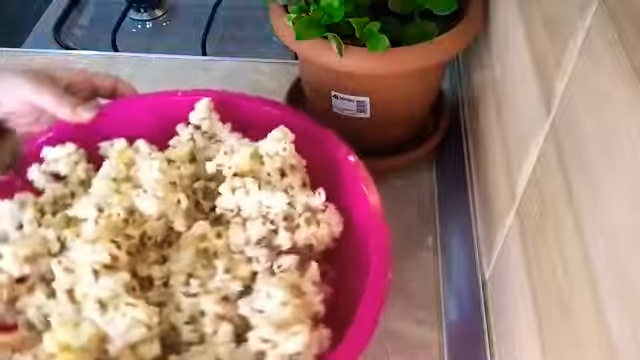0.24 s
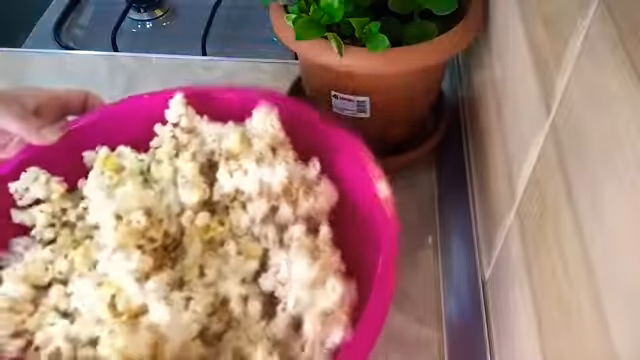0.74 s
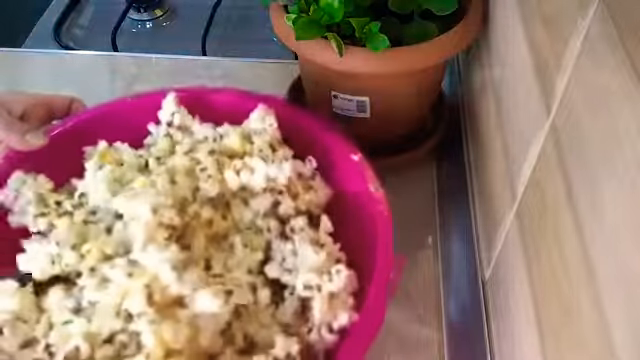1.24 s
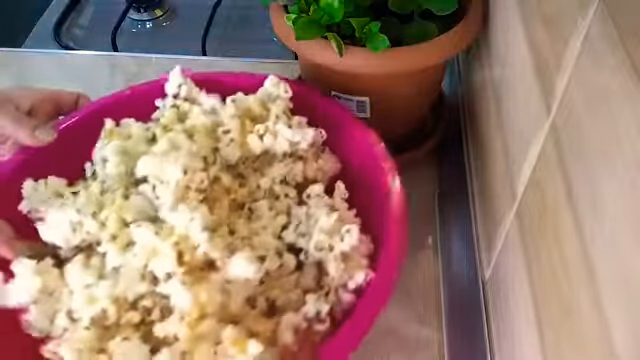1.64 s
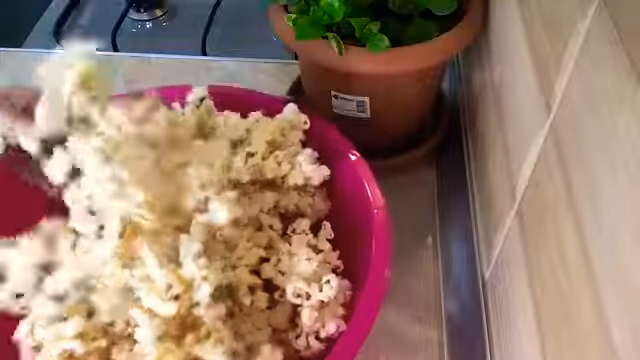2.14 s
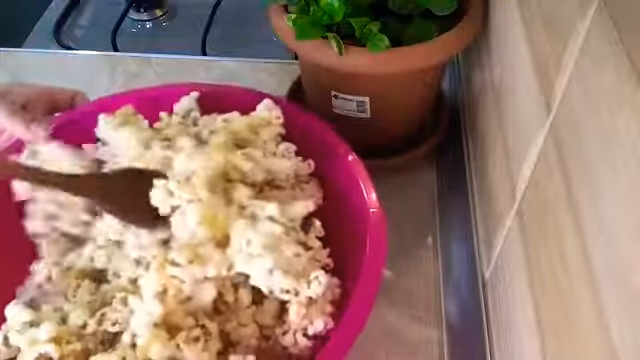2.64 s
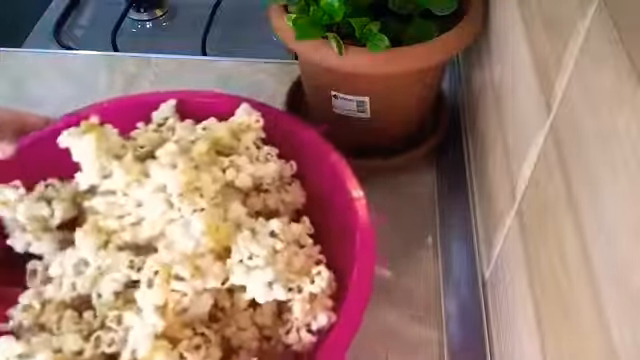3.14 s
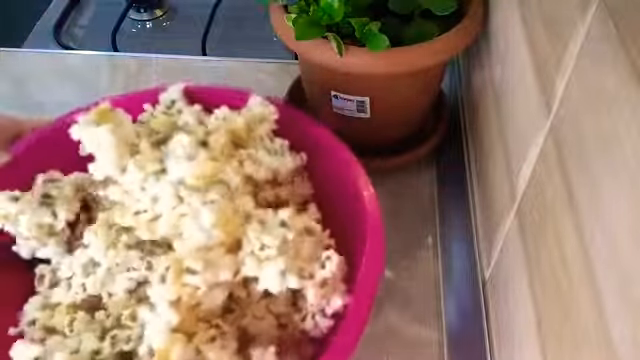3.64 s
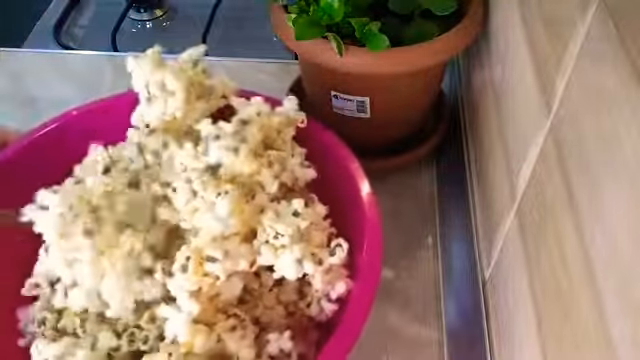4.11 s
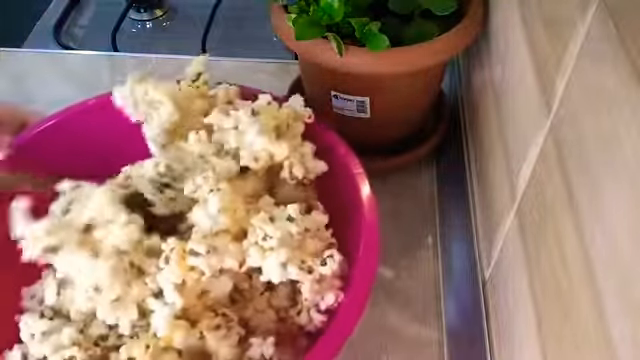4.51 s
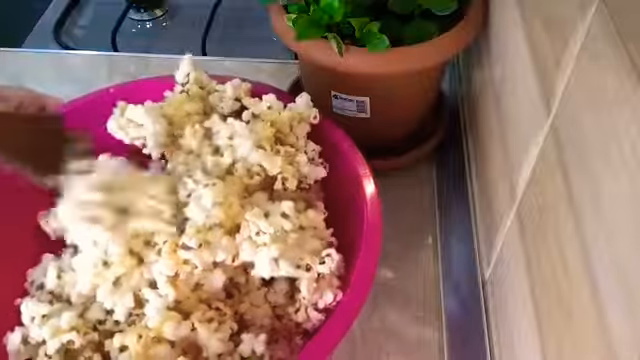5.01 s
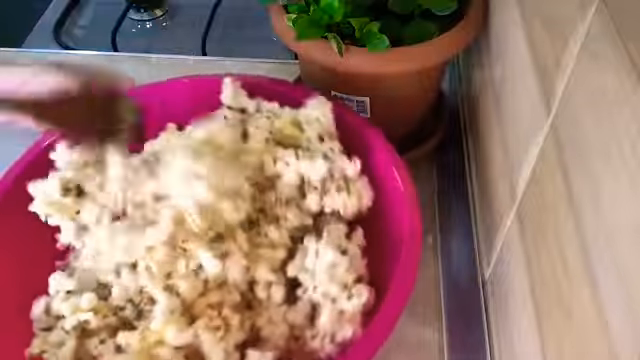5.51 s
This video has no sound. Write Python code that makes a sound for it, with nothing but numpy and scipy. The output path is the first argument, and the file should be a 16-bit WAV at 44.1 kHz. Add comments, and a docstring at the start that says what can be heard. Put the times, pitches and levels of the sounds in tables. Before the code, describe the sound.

A close microphone catches crisp caramel popcorn being stirred and tossed in a plastic bowl. It starts faintly, bursts into crackles and knocks at half a second, then moves through uneven strokes with lighter lulls. Around three seconds the snapping grows dense again, with a brief high squeak, and it later fades into gentle rustling. Small hard kitchen, quick short reflections, quiet low room hush.

```python
"""Caramel popcorn stirred in a plastic bowl

Hardened caramel popcorn is stirred and tossed with a wooden spoon in a plastic bowl on a kitchen counter.
The sugar shells crackle and snap: random clicks and timed cracks, each a burst of short ringing modes.
Clumps crunch, rub, tumble and now and then squeak; spoon and counter knock the bowl's decaying modes.
A small hard room answers with sparse echoes over a dull hush; the microphone is close.
"""
import sys
import numpy as np
from scipy import signal
from scipy.io import wavfile
from scipy.ndimage import uniform_filter1d

SR = 44100
rng = np.random.default_rng(int(sys.argv[2]) if len(sys.argv) > 2 else 0)


def to_wav(sig):
    """Store sig (one row per channel, or 1-D mono) as 16-bit WAV at the path in sys.argv[1].

    Samples outside -1..1 are clipped; the rate is SR.
    """
    pcm = np.clip(np.atleast_2d(sig), -1, 1) * 32767
    pcm = np.round(pcm).astype(np.int16)
    wavfile.write(sys.argv[1], SR, pcm.T)  # frames by channels


N = 254324
T = np.arange(N) / SR
EDGE_HZ = 16050  # top of the microphone's band

# spectrum of breaking sugar shells: [f/Hz, gain/dB]
SHELL_COLOUR = [(2400, -15.5), (3900, -9.5), (4800, -12), (5800, 1), (7400, -0.5), (9500, 2.5),
                (10400, -2.5), (11300, 0), (14500, -5), (16100, -12)]
# spectrum of crunching and rattling kernels: [f/Hz, gain/dB]
CRUNCH_COLOUR = [(800, -14), (1450, -2), (2100, -2), (2870, -1), (3500, -4.5), (4600, -6.5), (6800, -15),
                 (12000, -34)]


def amp(db):
    """Decibels to amplitude."""
    return 10 ** (np.asarray(db) / 20)


def unit(x):
    """Scale to an RMS of one."""
    return x / np.sqrt(np.mean(x ** 2) + 1e-20)


def read(points, hz):
    """A table of (Hz, value) joined by lines on a log-frequency axis."""
    f, value = np.transpose(points)
    return np.interp(np.log(hz + 1), np.log(f + 1), value)


def add(mix, s, sound):
    """Lay a sound into the mix from the time s, cut at the end."""
    part = mix[round(s * SR):][:len(sound)]
    part += sound[:len(part)]


def colour(x, points, size=8192):
    """Causal minimum-phase filter with the given spectrum, so clicks keep their sharp fronts."""
    hz = abs(np.fft.fftfreq(size, 1 / SR))
    log_gain = np.log(amp(read(points, hz)))
    spectrum = np.exp(signal.hilbert(log_gain).conj())
    taps = np.fft.ifft(spectrum).real[:size // 2]
    return signal.oaconvolve(x, taps)[:N]


def contacts(per_s, spread_db, cap):
    """Random tiny impacts, many weak and a few strong, with steady mean power."""
    size = amp(spread_db * np.minimum(rng.exponential(1, N), cap))
    struck = rng.random(N) < per_s / SR
    clicks = size * rng.choice([-1, 1], N) * struck
    power = uniform_filter1d(clicks ** 2, size=3500)
    return clicks / np.sqrt(abs(power) + 1e-6)


def chip(hz, ring_s, scatter, count=9):
    """A brittle shell breaks: a burst of splinters and a few brief modes scattered around its pitch."""
    t = np.arange(SR // 60) / SR
    modes_hz = np.minimum(hz * np.exp(scatter * rng.standard_normal((count, 1))), EDGE_HZ)
    ring = np.sin(2 * np.pi * (modes_hz * t + rng.random((count, 1)))).sum(0)
    splinters = rng.standard_normal(len(t)) * np.exp(-2 * t / ring_s)
    return unit(ring) * np.exp(-t / ring_s) + splinters


def grains(clicks, low_hz, high_hz, ring_s, count=28):
    """Every click strikes a kernel of random size; the size sets the pitch of its chip."""
    kernel = rng.integers(0, count, N)
    total = np.zeros(N)
    for k, hz in enumerate(np.geomspace(low_hz, high_hz, count)):
        sound = unit(chip(hz, ring_s, scatter=0.154, count=3))
        total += signal.oaconvolve(clicks * (kernel == k), sound)[:N]
    return unit(total)


def shifting(x, depth_db, size=9):
    """Gaps between the moving kernels open and close, so each moment has its own small resonances."""
    z = signal.stft(x, nperseg=512)[2]
    patches = rng.standard_normal(z.shape)
    for axis in (0, 1):  # smooth over frequency, then over time
        patches = uniform_filter1d(patches, size=size, axis=axis)
    return unit(signal.istft(z * amp(depth_db * unit(patches)), nperseg=512)[1][:N])


def stirring(axis):
    """Gain of crackle (0), crunch (1), rub (2) or tumble (3): strokes swell, hold, die as the heap settles."""
    # strokes of the spoon: [start t/s, attack/s, hold/s, release/s to fall 20 dB, effort/dB,
    #   then over the effort: bite into the clumps/dB, lean on the wall/dB, clumps dropped/dB]
    strokes = [(0.0, 0.0033, 0.0046, 0.24, -50.5, -11, -14, -2.5),
               (0.027, 0.061, 0.3, 0.132, -76.5, 5, 14, 11),
               (0.445, 0.053, 0.24, 0.27, -40, -1.5, -1.5, -2.5),
               (0.732, 0.038, 0.028, 0.18, -48.5, 10, 6, -15), (0.979, 0.244, 0.11, 0.6, -46.5, 4, 5, 0.5),
               (1.297, 0.21, 0.024, 0.08, -37.5, -0.5, -1, -13),
               (1.648, 0.17, 0.02, 0.16, -47.5, -8.5, 2.5, -6), (1.865, 0.02, 0.083, 0.1, -57, -4, 9.5, 12),
               (1.989, 0.091, 0.017, 0.23, -55, -18, -2.5, 2.5),
               (2.15, 0.057, 0.13, 0.03, -53.5, -10, 3.5, -0.5),
               (2.338, 0.18, 0.18, 0.13, -49, -10.0, -6.5, -4.5),
               (2.684, 0.072, 0.015, 0.18, -50.5, -2, 6.5, -0.5),
               (2.753, 0.048, 0.018, 0.06, -47, -4, -16, -9),
               (3.084, 0.058, 0.016, 0.23, -42.5, -1.5, 0.5, 0),
               (3.195, 0.037, 0.093, 0.148, -39.5, 3.5, 0, -1),
               (3.409, 0.018, 0.005, 0.25, -48.0, 7.0, 8.0, 3.5),
               (3.576, 0.09, 0.093, 0.17, -46.0, -3.0, 5.5, -2.0),
               (3.823, 0.04, 0.038, 0.04, -41.0, -3.0, 0.5, -3.5),
               (3.954, 0.033, 0.016, 0.84, -44, -8.5, -1.0, -6.5),
               (4.442, 0.14, 0.21, 0.03, -42.5, -5.0, -3, -3),
               (4.708, 0.057, 0.0045, 0.23, -47, 5, 10.5, 7.5), (4.82, 0.02, 0.04, 0.1, -46, -14, -17, -16),
               (5.127, 0.042, 0.017, 0.11, -44, -8.5, -12.5, -7),
               (5.173, 0.19, 0.112, 0.18, -44.0, -7.5, -9, -4),
               (5.44, 0.32, 0.015, 0.197, -60.0, -7.5, 6.5, -2)]
    # the bowl never rests in the hand: [crackle/dB, crunch/dB, rubbing/dB, tumbling/dB]
    resting = (-89, -96, -63, -56.5)
    swell_curve = 1.68  # a stroke's power grows with this power of time
    t = np.linspace(0, T[-1], num=N // 64)
    power = amp(resting[axis]) ** 2
    for start, attack, hold, release, effort_db, *shares_db in strokes:
        swell = np.clip((t - start) / attack, 0, 1) ** swell_curve
        settle_db = -20 * np.maximum(t - start - attack - hold, 0) / release
        stroke_db = effort_db + [0, *shares_db][axis] + settle_db
        power = power + swell * amp(stroke_db) ** 2
    return np.interp(T, t, np.sqrt(power))


def strays(gain, over_db, count):
    """Small events at random moments, as strong as the stirring is then: rows of (s, level dB)."""
    return [(T[i], 20 * np.log10(gain[i]) + over_db) for i in rng.integers(0, N, count)]


def room_tone(level_db=-58):
    """The quiet, dull hush of the kitchen: noise through a falling spectrum."""
    # spectrum of the hush: [f/Hz, gain/dB]
    hush_colour = [(28, -6), (85, -4.5), (280, 3.5), (520, -11.5), (1000, -10), (2000, -31), (4200, -29.5),
                   (9500, -32), (15800, -33)]
    return amp(level_db) * unit(colour(rng.standard_normal(N), hush_colour))


def reflections(t60_share, gap_s):
    """Sparse echoes of unit energy after a gap, the bass lasting longest."""
    # decay of the room, before each echo group's share: [f/Hz, t60/s]
    room_decay = [(85, 0.73), (320, 0.35), (950, 0.33), (2900, 0.21), (7800, 0.16), (15800, 0.19)]
    size = SR // 2
    arrives = (rng.random(size) < 4000 / SR) * (np.arange(size) / SR > gap_s)
    taps = rng.choice([-1, 1], size) * arrives
    hz, t, z = signal.stft(taps, SR, nperseg=256)
    t60 = t60_share * read(room_decay, hz)[:, None]
    tail = signal.istft(z * amp(-60 * t / t60), SR, nperseg=256)[1]
    return tail / np.linalg.norm(tail)


def kitchen(x, near_db=-10, far_db=-13.5):
    """Quick bright echoes from bowl and counter, then the fainter tail of the room."""
    bright = signal.butter(2, 1300, "highpass", fs=SR)
    near = signal.lfilter(*bright, reflections(t60_share=.2, gap_s=.0015))
    echoes = amp(near_db) * near + amp(far_db) * reflections(t60_share=0.73, gap_s=0.011)
    return x + signal.fftconvolve(x, echoes)[:N]


def squeaks(level_db=0, jitter=0.039, width=0.16):
    """Sticky kernels stick and slip on the plastic: an uneven train of slips through one broad resonance."""
    # squeaks: [t/s, length/s, level/dB, slip rate at the start f/Hz, at the end f/Hz, resonance f/Hz]
    squeak_table = [(0.787, 0.058, -40, 520, 440, 2740), (3.316, 0.017, -34.5, 1100, 990, 5850),
                    (3.38, 0.021, -49, 1300, 1300, 3900), (3.484, 0.036, -46, 770, 810, 1670)]
    out = np.zeros(N)
    order = np.arange(1, 15)[:, None]  # harmonics of the slip rate
    for s, length, db, start_hz, end_hz, peak_hz in squeak_table:
        slip_hz = np.linspace(start_hz, end_hz, round(length * SR))
        wander = unit(uniform_filter1d(rng.standard_normal(SR), size=40))[:len(slip_hz)]
        turns = np.cumsum(slip_hz * (1 + jitter * wander)) / SR
        resonance = 1 / np.hypot(width, np.log(order * slip_hz / peak_hz)) ** 2
        tone = (np.cos(2 * np.pi * order * turns) * resonance).sum(0)
        add(out, s, amp(db) * unit(tone) * signal.windows.tukey(len(tone)))
    return amp(level_db) * out


def tumble(level_db=0.0):
    """Light clumps fall on the bottom of the bowl with soft thuds."""
    # spectrum of the thuds: [f/Hz, gain/dB]
    thud_colour = [(24, -56), (42, -15), (66, 3), (96, 6), (135, -3.5), (205, 3.5), (295, -3.5), (395, 2),
                   (470, -9.5), (850, -9), (2100, -65), (8000, -113)]
    thuds = colour(contacts(per_s=320, spread_db=2.0, cap=10.0), thud_colour)
    return amp(level_db) * unit(thuds) * stirring(axis=3)


def knocks(level_db=-6, load=0.023, rattle_db=-8, rattle_s=0.0023, bounce_db=-7):
    """Each knock rings the bowl and jolts the kernels; low bending waves travel slower and arrive later."""
    # knocks by spoon and counter, before the layer levels:
    #   [t/s, strength level/dB, weight in the low modes/dB, hardness in the high modes and the rattle/dB]
    knock_table = [(0.149, -42, -1, 4), (0.4721, -11.5, -5, 0), (.557, -24, -5, -16),
                   (.636, -29, -1.5, 5.5), (.6925, -20, 4, 4.5), (.699, -17.5, 1, -19),
                   (1.032, -29, -16, 10.5), (1.2056, -6, 2.5, -6), (1.322, -34.5, -10, 18.5),
                   (1.4198, -27, -10.5, 15.5), (1.559, -25.5, -12.5, 7.5), (1.709, -30, -12, 8.5),
                   (1.8665, -8.5, 3, -0.5), (2.257, -34, -16, 3.5), (2.286, -32.5, -4.5, -2),
                   (2.326, -40.5, 4.5, 15), (2.766, -26, -28, 9.5), (3.206, -22.5, -4.5, 7),
                   (3.241, -25, -10, 15.5), (3.424, -31.5, 2, 7), (3.6245, -15, -3, 0),
                   (3.755, -23.5, 2, 1.5), (3.763, -26, 8.5, 5), (3.866, -31.5, -10, 9),
                   (4.259, -29.5, -26.5, 5), (4.301, -24, -30.5, 1.5), (4.3396, -27.5, -21, 4.5),
                   (4.757, -19, -32, -2), (4.791, -20, -9, 0.5), (4.934, -29.5, -14, -5),
                   (5.37, -26.5, -40, -25)]
    # modes of the plastic bowl, before the popcorn detunes them: [f/Hz, level/dB, t60/s]
    bowl_modes = [(74.2, -21, 0.2), (101, -6.5, 0.11), (125, -11.5, 0.028), (185, -7, 0.098),
                  (235, -14, 0.055), (328, -16, 0.16), (372, 1.5, 0.068), (475, -16.5, 0.094),
                  (564.6, -0.5, 0.067), (697, 0.5, 0.046), (798, -4, 0.019), (942, 0.5, 0.041),
                  (980, 3, 0.051), (1140, -3, 0.014), (1236, 4, 0.025), (1427, -10.5, 0.043),
                  (1573, -20.5, 0.11), (1627, -15.5, 0.025), (1767, -12.5, 0.02), (2320, -16.5, 0.013),
                  (2648, -3.5, 0.011), (2962, -13.5, 0.029)]
    tap_db, tap_weight_db, tap_hard_db = 9.5, -2, 9.5  # stray kernels tap the wall; first is over the rubbing
    travel_s, rise_s = .0007, .0003
    hz, mode_db, t60 = np.transpose(bowl_modes)[:, :, None]
    since = np.arange(SR // 4) / SR
    t = np.maximum(since - travel_s * (np.sqrt(hz.max() / hz) - 1), 0)
    fade = amp(mode_db - 60 * t / t60) * (1 - np.exp(-t / rise_s))
    ring, rattle = np.zeros((2, N))
    taps = [(s, db, tap_weight_db, tap_hard_db) for s, db in strays(stirring(axis=2), tap_db, count=50)]
    for s, strength_db, weight_db, hard_db in knock_table + taps:
        tilt = [(100, 2.2 * weight_db), (380, weight_db), (950, 0.032), (2600, hard_db)]  # (Hz, dB)
        blow = amp(strength_db + read(tilt, hz))
        spot = rng.uniform(-0.38, 0.43, hz.shape)  # where the blow lands shifts each mode's phase
        loaded_hz = hz * (1 + load * rng.standard_normal(hz.shape))  # the shifting popcorn detunes the wall
        knock = (blow * fade * np.sin(2 * np.pi * (loaded_hz * t + spot))).sum(0)
        add(ring, s, knock)
        add(ring, s + rng.uniform(.0065, .0085), amp(bounce_db) * knock)  # the springy wall strikes back once
        jolt = rng.standard_normal(len(since)) * np.exp(-since / rattle_s)
        add(rattle, s, amp(strength_db + hard_db) * jolt)
    return amp(level_db) * ring + amp(rattle_db) * colour(rattle, CRUNCH_COLOUR)


def snaps(level_db=-13.5, stage_s=0.0011, small_hz=6500, small_db=22):
    """The larger caramel shells break one by one, each crack running in a few quick stages."""
    # the largest shells breaking, before the layer level: [t/s, level/dB, centre of the modes f/Hz]
    snap_table = [(0.454, -11, 11000), (0.478, -20, 8350), (0.515, -9.5, 9900), (.5367, -6, 8950),
                  (.575, -11, 5500), (0.647, -13, 5360), (1.153, -16.5, 8490), (1.206, -3.5, 6830),
                  (1.331, -10, 9500), (1.420, -7, 5650), (1.867, -6, 6030), (2.382, -22, 11400),
                  (2.505, -22, 9000), (2.862, -16.5, 9600), (3.1103, -15, 11700), (3.201, -12, 4500),
                  (3.2223, -11, 7900), (3.241, -22, 6000), (3.2963, -9.5, 9200), (3.4312, -14.5, 6800),
                  (3.453, -9, 7100), (3.89, -17, 9700), (4.073, -12.5, 9000), (4.6416, -13, 6840),
                  (4.799, -14.5, 7600), (5.063, -30, 9550)]
    out = np.zeros(N)
    small = [(s, db, small_hz) for s, db in strays(stirring(axis=0), small_db, count=35)]
    for s, db, hz in snap_table + small:
        crack = np.cumsum(stage_s * rng.uniform(.5, 1.5, size=2))
        for delay, stage_db in zip([0, *crack], [0, -3, -7]):
            add(out, s + delay, amp(db + stage_db) * chip(hz, ring_s=0.00068, scatter=0.303))
    return amp(level_db) * colour(out, SHELL_COLOUR)


def crunch_and_rub(crunch_db=-3, rub_db=2.5, shared=0.63):
    """Clumps catch and slip under the spoon; each slip crunches a kernel and shakes the wall."""
    # spectrum of the rubbed wall: [f/Hz, gain/dB]
    rub_colour = [(200, -24), (460, -13), (565, -8), (790, -11), (950, 4), (1060, -2), (1320, -8),
                  (1620, -13), (2100, -23), (3800, -43), (9000, -70)]
    slips = contacts(per_s=1100, spread_db=3.5, cap=4.2)
    drag = contacts(per_s=500, spread_db=3.2, cap=4)
    kernels = grains(slips, low_hz=1360, high_hz=5500, ring_s=0.0022)
    crunch = shifting(colour(kernels, CRUNCH_COLOUR), depth_db=2.2)
    rub = shifting(colour(drag + shared * slips, rub_colour), depth_db=2.5, size=5)
    return amp(crunch_db) * crunch * stirring(axis=1) + amp(rub_db) * rub * stirring(axis=2)


def crackle(level_db=-1.0, fizz_db=-5, split_hz=9500):
    """Sugar shells of many sizes tick against each other over a fine sliding fizz."""
    # light grazing favours the smallest splinters: fineness at even bite, and its change per dB of bite
    fine_db, fine_per_bite = 0.4, -0.38
    clicks = contacts(per_s=1700, spread_db=4.2, cap=4.5)
    ticks = grains(clicks, low_hz=4277, high_hz=15350, ring_s=0.0026)
    fizz = amp(fizz_db) * rng.standard_normal(N)
    shells = shifting(colour(ticks + fizz, SHELL_COLOUR), depth_db=0.87)
    coarse = signal.sosfiltfilt(signal.butter(2, split_hz, fs=SR, output="sos"), shells)
    splinters = shells - coarse
    effort = stirring(axis=0)
    bite = stirring(axis=1) / effort
    fine = amp(fine_db) * bite ** fine_per_bite
    return amp(level_db) * (coarse / fine + splinters * fine) * effort


def scene():
    """The stirred bowl in its kitchen, over the room's hush."""
    bowl = squeaks() + tumble() + knocks() + snaps() + crunch_and_rub() + crackle()
    return (kitchen(bowl) + room_tone())[None]


def record(dry, low_hz=50):
    """A small close microphone rounds off the hardest knocks and sheds the deep bass; then the band limit."""
    rounded = .9 * np.tanh(dry / .9)
    thin = signal.sosfilt(signal.butter(4, low_hz, "highpass", fs=SR, output="sos"), rounded)
    band = signal.firwin(401, EDGE_HZ, window=("kaiser", 9), fs=SR)
    return signal.oaconvolve(thin, band[None], "same")


dry = scene()
out = record(dry)
to_wav(out)
```